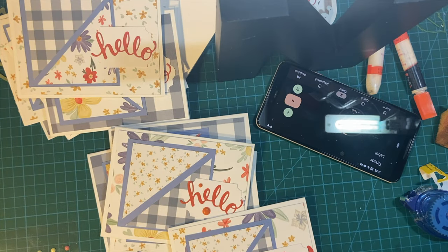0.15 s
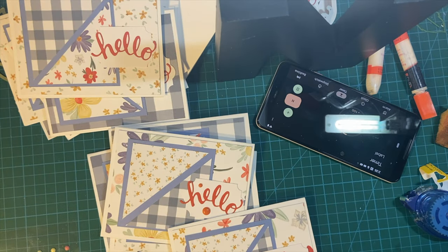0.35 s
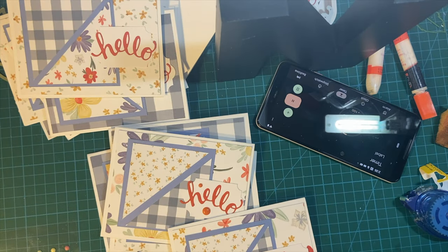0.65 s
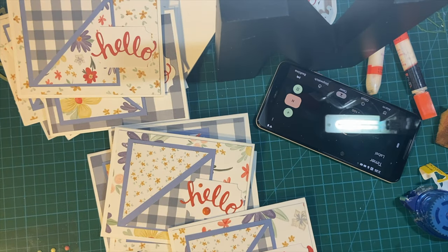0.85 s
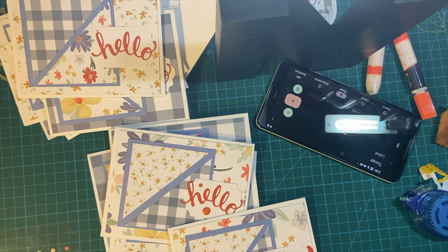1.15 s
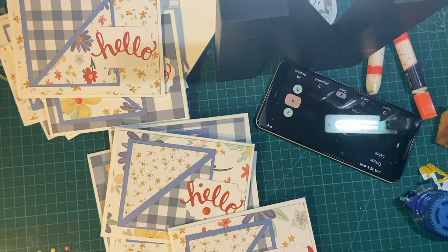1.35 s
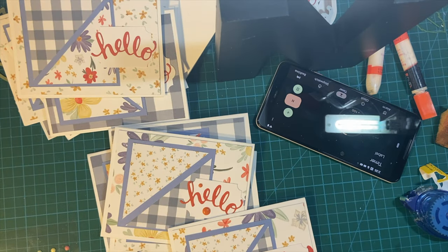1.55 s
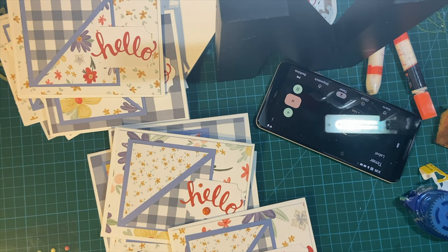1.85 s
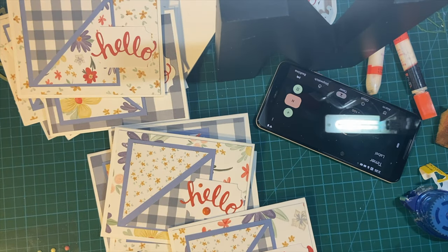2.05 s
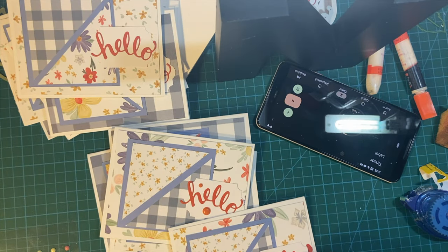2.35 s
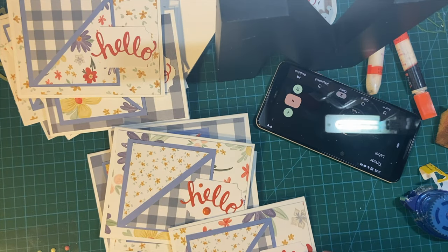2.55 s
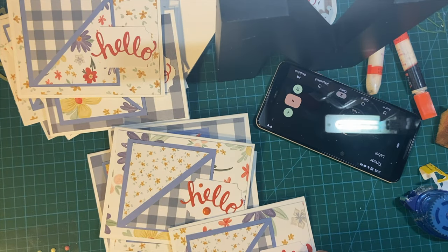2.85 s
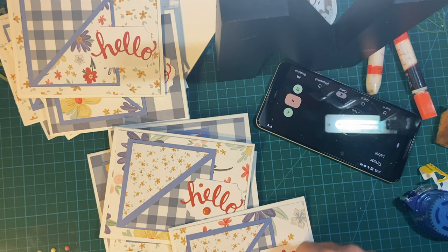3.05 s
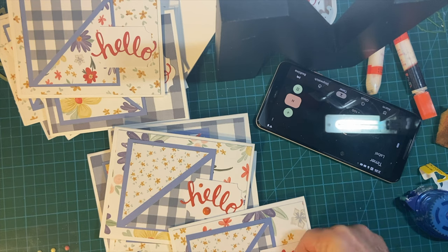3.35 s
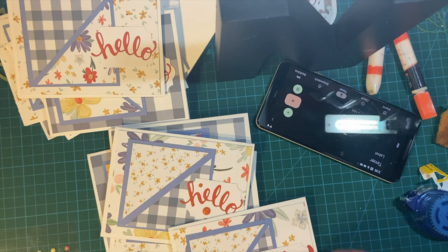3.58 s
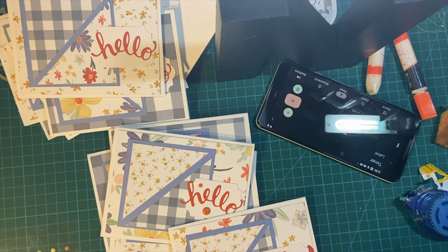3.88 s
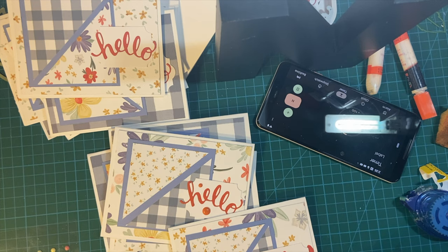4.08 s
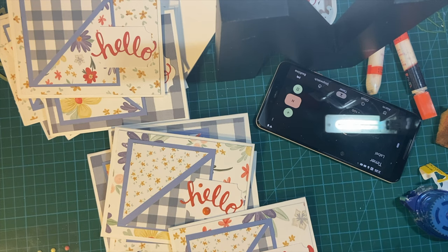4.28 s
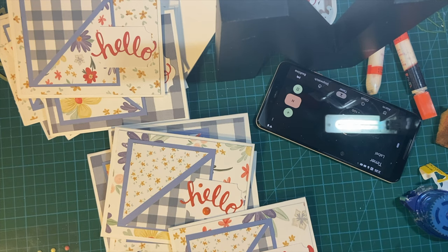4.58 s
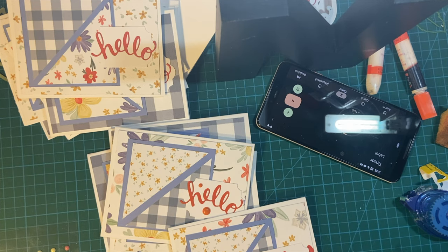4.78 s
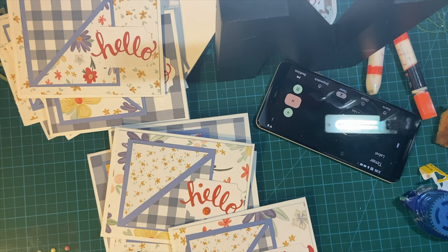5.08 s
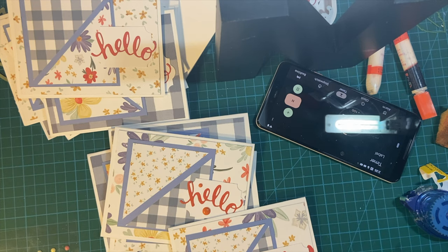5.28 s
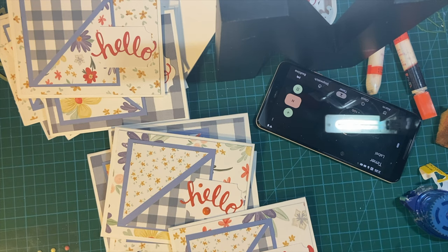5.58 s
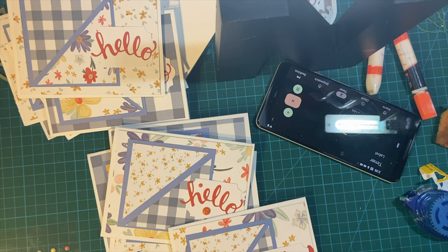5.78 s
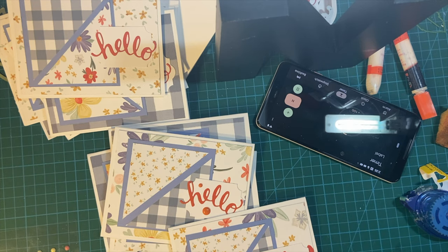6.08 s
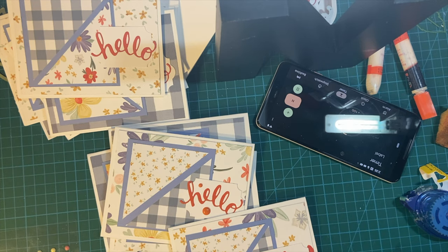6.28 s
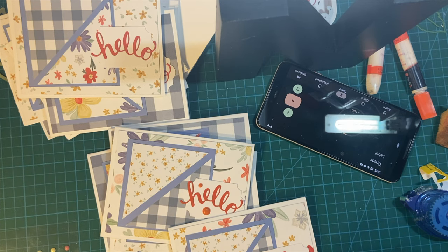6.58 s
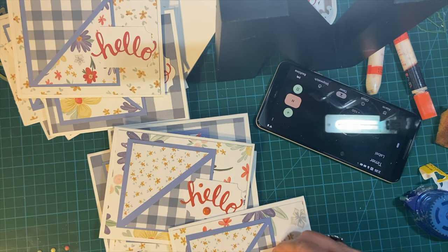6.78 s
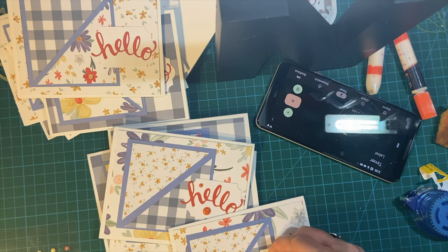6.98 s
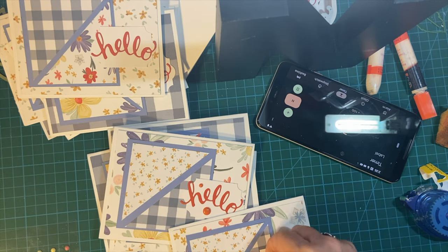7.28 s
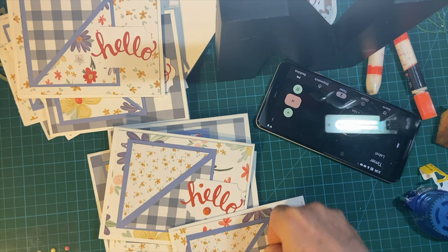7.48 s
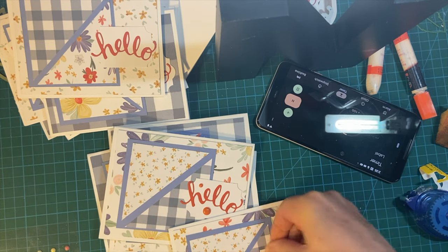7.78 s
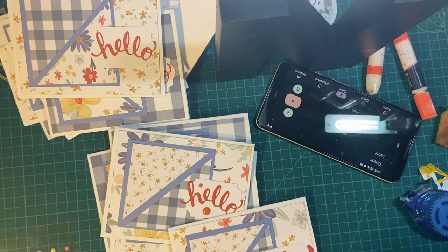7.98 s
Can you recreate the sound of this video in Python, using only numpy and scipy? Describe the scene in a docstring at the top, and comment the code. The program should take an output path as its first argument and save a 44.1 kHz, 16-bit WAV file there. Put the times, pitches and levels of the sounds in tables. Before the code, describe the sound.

Stiff paper cards snap, brush and slap onto a cutting mat, two hits thudding deep through the table, over a faint low household hum.

```python
"""Stiff paper cards snap, slide and slap on a cutting mat at a craft table, heard from close by in a small room.
Small snaps and strokes come first; from 1.7 s hard slaps add the table's decaying modes, strongest at 3.0 s.
A sagging tone buzzes at 3.6 s; more strokes follow, and hard slaps at 6.4 and 7.4 s. Snaps are short bursts of
band-filtered noise and strokes are fluttering friction noise, both with diffuse echoes; two knocks are
dispersed bending waves. Shaped noise and unsteady tones make a low household rumble and hum throughout."""
import sys
import numpy as np
from scipy import signal
from scipy.fft import rfft, irfft, next_fast_len
from scipy.io import wavfile
from scipy.ndimage import uniform_filter1d, map_coordinates

SR = 44100
rng = np.random.default_rng(int(sys.argv[2]) if len(sys.argv) > 2 else 0)


def generate_wav(sig):
    """Save sig (samples, or channels by samples) to the path in sys.argv[1] as 16-bit PCM at SR."""
    pcm = np.round(np.clip(np.atleast_2d(sig).T, -1, 1) * 32767).astype(np.int16)
    wavfile.write(sys.argv[1], SR, pcm)


N = 358974

# Slaps that shake the table. Each row: start in seconds, relative level in dB, share of the upper modes in dB,
# extra thud of the mat in dB.
TABLE_SLAPS = [(1.681, -46.5, -7, 0), (1.921, -47.5, -1, 4.5), (2.348, -48, -7, 0), (2.607, -55.5, 0, 0.5),
               (3.003, -20, -1.5, 16), (6.371, -46.5, -8, 1.5), (7.393, -24, -4.5, 19)]
# Strokes of card over card. Each row: start in seconds, length in seconds, rub level in dB,
# speed as the level of scrape over rub in dB.
CARD_STROKES = [(0, 0.056, -71.5, 9), (0.279, 0.073, -76, 3), (1.265, 0.31, -81.5, 1),
                (2.061, 0.098, -68.5, 4), (2.193, .13, -72.5, 2), (2.851, 0.18, -80, -2.5),
                (3.098, 0.063, -70, 3), (3.153, 0.15, -72, 9), (3.326, 0.35, -70.5, -7),
                (3.683, 0.43, -70, -22.5), (4.484, 0.21, -68, -2.5), (6.557, 0.22, -61, 7),
                (6.803, 0.078, -87, -3.5), (7.306, 0.33, -82, -1), (7.489, 0.25, -80.5, -6),
                (7.74, 0.41, -72, 4)]


def amp(db):
    """The decibel is logarithmic: twenty of them are a tenfold amplitude."""
    return 10 ** (np.asarray(db) / 20)


def unit(x):
    """Normalisation by the root mean square, the amplitude that carries the mean power."""
    return x / np.sqrt(np.mean(x ** 2) + 1e-20)


def along(points, hz):
    """Interpolation of (Hz, value) points on a logarithmic frequency axis, as pitch is heard."""
    point_hz, value = np.transpose(points)
    return np.interp(np.log(hz + 1), np.log(point_hz + 1), value)


def wobble(rate):
    """Slow random modulation: a smooth curve through random knots, rate of them a second."""
    knots = rng.standard_normal(int(N * rate / SR) + 4)
    return map_coordinates(knots, [np.arange(N) * rate / SR])


def filtered(x, response):
    """Linear filtering: the spectrum is multiplied by a complex response of frequency."""
    size = next_fast_len(x.shape[-1] + 2048)
    hz = np.fft.rfftfreq(size, 1 / SR)
    return irfft(rfft(x, size) * response(hz), size)[..., :x.shape[-1]]


def band(hz, low_hz, high_hz):
    """A steep causal band-pass response, scaled to keep the energy of white noise."""
    poles = signal.butter(5, [low_hz, high_hz], "band", analog=True, output="zpk")
    gain = signal.freqs_zpk(*poles, hz)[1]
    return gain / np.sqrt(np.mean(np.abs(gain) ** 2))


def resonance(hz, centre_hz, width_hz):
    """The response of a damped oscillator, equal to 1 at its centre."""
    damping = 1j * hz * width_hz
    return damping / (centre_hz ** 2 - hz * hz + damping)


def diffuse(pair):
    """Partial coherence: two unrelated signals are mixed to the likeness of diffuse sound at two ports."""
    # Each row: frequency in Hz, left-right likeness as a correlation.
    likeness = [(60, 1), (200, 1), (400, 0.2), (700, 0.19), (1300, 0.057), (3000, 0.81), (5500, 0.98),
                (8000, 0.96)]

    def mixing(hz):
        angle = np.arccos(np.clip(along(likeness, hz), -1, 1)) / 2
        return np.array([np.cos(angle), np.sin(angle)])

    mid, side = filtered(pair, mixing)
    return np.array([mid + side, mid - side])


def noise(spectrum):
    """Spectral shaping of white noise into diffuse stereo noise of rms 1."""
    return unit(diffuse(filtered(rng.standard_normal((2, N)), lambda hz: amp(along(spectrum, hz)))))


def snaps():
    """Impulsive excitation: bursts drive mat thud, card bending, crackle and edge hiss, each with its echo."""
    # Each row: start in seconds, relative bending level in dB, bending pitch in Hz,
    # contact time in ms (held to 1.5 to 30 in use), crackle over bending in dB, edge hiss over bending in dB.
    card_snaps = [(0.022, -62, 2120, 20, -9, -18), (.06, -64, 1980, 5, -5, -6),
                  (.086, -51, 2280, 3.9, -0.5, -10), (.115, -34, 1606, 4.4, 1.5, -14.5),
                  (.329, -61.5, 2400, 9, -4, -13), (.491, -67.5, 2070, 8.2, -6.5, -16),
                  (1.066, -42, 1616, 8.2, -16, -25), (1.192, -40, 1750, 2.04, 1, -4.5),
                  (1.383, -44.5, 1740, 3.2, 3.5, -5.5), (1.683, -24.5, 1880, 2.57, -0.5, 7),
                  (1.793, -33.5, 1944, 6.9, 4.5, 3.5), (1.918, -28, 1676, 5.2, 3, 10),
                  (2.095, -49, 1450, 15, 7, -1.5), (2.111, -44, 2160, 8.3, 5.5, 3),
                  (2.13, -44.5, 1250, 5, -21.5, -34.5), (2.24, -64, 1540, 14, 8, -3),
                  (2.255, -56, 1190, 16, -5.5, -6), (3.003, -25.5, 1657, 2.4, 2, 8.5),
                  (3.148, -61.5, 2130, 11.5, 9, 2), (3.261, -59, 1790, 12, 0, -3),
                  (3.303, -60, 1610, 5.1, -7, -10), (3.34, -62.5, 1870, 3.4, 11.5, 1.5),
                  (3.407, -64.5, 1310, 3.8, 5, -15.5), (3.474, -61.5, 1100, 32, -13, -22.5),
                  (3.529, -58.5, 1444, 4.7, -8.5, -11.5), (3.56, -53, 1430, 3.1, -9, -19),
                  (3.882, -56, 1660, 13.3, 4, -3), (3.9, -59.5, 1620, 22, -1, -6.5),
                  (3.959, -62.5, 2060, 5.5, 0, -2.5), (4.03, -68, 2040, 16.4, -8.5, -14.5),
                  (4.066, -66.5, 1790, 3.9, -2, -19), (4.283, -65.5, 1420, 31, 1.5, -2),
                  (4.308, -32.5, 1600, 5.2, -8.5, -24.5), (4.376, -62, 930, 13.4, -20, -36),
                  (4.493, -61, 1690, 6.7, -0.5, -6), (4.526, -48, 1252, 11, -28, -48),
                  (4.539, -55, 1360, 3, .5, -7), (4.591, -60.5, 1600, 13.5, 3.5, -4.5),
                  (4.638, -57, 1050, 14, -3, -11.5), (4.654, -61, 1920, 10, 2.5, 2.5),
                  (4.672, -58, 1720, 11.4, 1, -4.5), (4.941, -62.5, 888, 7.8, -29.5, -38),
                  (4.999, -43, 1404, 4.2, -8.5, -40), (5.441, -54.5, 1246, 10.4, -23.5, -22),
                  (5.474, -75.5, 1590, 18, 3, 5.5), (5.562, -43.5, 1600, 5.8, -16, -46.5),
                  (5.614, -48, 1320, 2.3, -14.5, -16.5), (5.71, -42.5, 2180, 2.3, -16.5, -13.5),
                  (5.831, -73, 1970, 6.4, -6, 8.5), (5.845, -40.5, 2100, 2.93, -6.5, 6),
                  (6.14, -73, 1590, 4.7, -14, 0), (6.303, -78, 1700, 5.5, 0.5, -3.5),
                  (6.37, -25.5, 1614, 4.74, 0.5, 3.5), (6.379, -27, 1350, 5.9, 4, 2.5),
                  (6.375, -39.5, 1684, 5, 0, -6.5), (6.384, -36.5, 1800, 5.7, 10.5, -8),
                  (6.559, -69.5, 1730, 4.3, 17, 9), (6.574, -37, 1630, 14.9, 1, -2.5),
                  (6.626, -49, 2050, 19, 6, 5), (6.682, -57, 1574, 18, 8, 6),
                  (6.75, -49, 1500, 6.4, -12, -9), (7.393, -32.5, 1624, 3.07, 6, 8.5),
                  (7.513, -58, 1440, 2.8, 0, -18), (7.787, -62, 1650, 30.4, 3, 1),
                  (7.828, -46.5, 1450, 2.3, -4, -13.5), (7.856, -45.5, 1660, 1.4, -14, -30),
                  (7.886, -57, 1250, 4.5, -10, -17), (7.927, -56.5, 1590, 10, -6, -26),
                  (7.952, -58, 1850, 4.4, -23, -30), (8.033, -65.5, 2150, 7, -2, -25),
                  (8.083, -52, 2300, 14.4, -13, -5), (8.13, -57.5, 1750, 18, -1, 2)]
    # Papery ring. Each row: pitch over the bending pitch, width over the bending pitch, lift in dB.
    card_modes = [(.66, 0.067, -4.5), (1.101, 0.086, -0.5), (1.499, 0.065, -1), (2.301, 0.083, 3),
                  (3.1, 0.18, 0.5)]
    mode_scatter = .08  # random relative scatter of the ring pitches, drawn anew for each snap
    # mat thud over the bending: level for a card at mat_hz, and more for each octave lower
    mat_level_db, mat_hz, mat_per_octave_db = -15.5, 1610, 13
    out = np.zeros((2, N + SR))
    t, late = np.arange(SR // 20) / SR, np.arange(SR // 4) / SR
    for start, bend_db, bend_hz, contact_ms, crackle_db, edge_db in [*card_snaps, *small_snaps()]:
        # a snap that coincides with a table slap thuds harder on the mat
        slap_db = sum(slap[3] for slap in TABLE_SLAPS if abs(start - slap[0]) < .005)
        mat_db = mat_level_db + mat_per_octave_db * np.log2(mat_hz / bend_hz) + slap_db
        rings = [(bend_hz * ratio * (1 + mode_scatter * rng.standard_normal()), bend_hz * width, lift_db)
                 for ratio, width, lift_db in card_modes]
        low_hz, high_hz = bend_hz / 1.84, bend_hz * 1.53  # the bending band moves its neighbours' edges
        edges = [(140, low_hz), (low_hz, high_hz), (high_hz, 6400), (6400, 16300)]
        levels_db = (mat_db, 0, crackle_db, edge_db)

        def parts(hz):
            paper = 1 + sum(amp(lift_db) * resonance(hz, centre, width) for centre, width, lift_db in rings)
            bands = [amp(bend_db + db) * band(hz, *edge) for db, edge in zip(levels_db, edges)]
            return paper * np.array(bands)

        span = np.clip(contact_ms, 1.5, 30) / 1000
        shape = (t / span) * np.exp(-(t / (0.36 * span)) ** 0.91)  # long contact rises and dies gently
        steps = np.repeat(rng.standard_normal(len(t) // 40 + 1), 40)[:len(t)]
        clumps = amp(5.5 * steps)  # fibres let go in fits
        raw = rng.standard_normal((4, len(t))) * shape * clumps
        raw /= np.linalg.norm(raw, axis=1, keepdims=True)
        burst = filtered(raw, parts).sum(0)

        swell = 1 - np.exp(-late / (.001 + span / 2))  # walls answer late
        sound = amp(-10.0) * swell * tail(lambda hz: np.linalg.norm(parts(hz), axis=0))
        sound[:, :len(t)] += burst
        first = round(start * SR)
        out[:, first:first + len(late)] += amp(-2.5) * np.sqrt(span * SR) * sound
    return out[:, :N]


def small_snaps():
    """A random point process: rows like those of the card snaps, scattered through the faster strokes."""
    per_second, brush_db = 5, -12  # strokes with a speed below brush_db only brush
    over_rub_db, scatter_db, pitch_hz, contact_ms = 2.5, 3.5, 1720, 7.4
    crackle_db, edge_db = -4.5, -16.5  # over the bending, for a speed of 0 dB
    rows = []
    for start, length, rub_db, speed_db in CARD_STROKES:
        if speed_db < brush_db:
            continue
        for place, size, pitch in rng.random((round(length * per_second), 3)):
            level_db = rub_db + over_rub_db - scatter_db * np.log(size + 0.0072)
            rows.append((start + place * length, level_db, pitch_hz * (.75 + pitch / 2), contact_ms,
                         crackle_db + speed_db / 2, edge_db + speed_db / 2))
    return rows


def booms():
    """Modal vibration: one soft push starts the heavy table top's modes, which swell and decay."""
    # Table-top modes, the lowest a beating pair. Each row: frequency in Hz, relative level in dB,
    # time to decay by 60 dB in seconds.
    table_modes = [(61.8, -4.5, .26), (56.6, -7, .31), (116.7, 0, 0.14), (350, -19.5, .09)]
    out, t = np.zeros(N + SR), np.arange(SR // 2) / SR
    for start, level_db, upper_db, _ in TABLE_SLAPS:
        ring = np.zeros(len(t))
        for hz, mode_db, t60 in table_modes:
            decay = amp(mode_db + upper_db * (hz > 100) - 60 * t / t60)
            swell = 1 - np.exp(-(t * hz / 1.8) ** 2)
            ring += decay * swell * np.cos(2 * np.pi * hz * (t - .0055))
        first = round(start * SR)
        out[first:first + len(t)] += amp(level_db + 8.5) * ring
    return out[:N]


def slide():
    """Sliding friction: noise in fluttering clumps, with tiny fibre ticks whose sizes scatter widely."""
    rub_hz, rub_width_hz, rub_lift_db = 1070, 280, -1.5  # the pile of cards hums under the rub
    ticks = (rng.random(N) < 600 / SR) * amp(4 * rng.exponential(size=N)) * rng.standard_normal(N)
    clumps = rng.standard_normal(N) * amp(2.5 * wobble(120) + 2 * wobble(30))
    grit = unit(clumps + .5 * unit(ticks))

    # random patches of time and frequency make the friction noise's colour uneven
    z = signal.stft(grit, nperseg=256)[2]
    patches = uniform_filter1d(rng.standard_normal(z.shape), size=2, axis=0)
    patches = uniform_filter1d(patches, size=16, axis=1)
    grit = signal.istft(z * amp(3 * unit(patches)), nperseg=256)[1][:N]
    grit = filtered(grit, lambda hz: 1 + amp(rub_lift_db) * resonance(hz, rub_hz, rub_width_hz))

    edges = [(550, 2500), (2500, 7500), (7500, 15800)]  # rub, scrape, hiss in Hz
    return sum(gain * unit(filtered(grit, lambda hz: band(hz, *edge)))
               for gain, edge in zip(strokes(), edges))


def strokes():
    """Friction grows brighter with speed: gains of rub, scrape and hiss, with one shape for every stroke."""
    rise_s, fall_s, fade_db = .04, 0.017, 17  # swells, lets go, fades by dB a second
    hiss_db, hiss_grows = -6.5, 0.78  # hiss over rub, and its growth in dB per dB of speed
    gains = np.zeros((3, N))
    for start, length, rub_db, speed_db in CARD_STROKES:
        t = np.arange(N) / SR - start
        swell = np.clip(t / rise_s + .5, 0, 1)
        release = np.clip((length - t) / fall_s + 1, 0, 1) ** 2
        fade = amp(-fade_db * np.clip(t, 0, length))
        levels_db = rub_db + np.array([[0], [speed_db], [hiss_db + hiss_grows * speed_db]])
        gains += amp(levels_db) * swell * release * fade
    return gains


def knocks():
    """Dispersion: a card edge knocks bending waves into the table top; treble arrives first, so pitch dives."""
    # Each row: start in seconds, relative level in dB.
    edge_knocks = [(1.683, -29.5), (1.918, -33)]
    cycles, first_s, t60_s = 1.5, .002, 0.17  # pitch times delay; arrival time scale; decay by 60 dB
    out, t = np.zeros(N + SR), np.arange(1, SR // 10) / SR
    late = t / first_s
    envelope = late ** 2 / (1 + late ** 2.7) * amp(6 - 60 * t / t60_s)
    wave = envelope * np.sin(2 * np.pi * cycles * np.log(late))
    for start, level_db in edge_knocks:
        first = round(start * SR)
        out[first:first + len(t)] += amp(level_db) * wave
    return out[:N]


def buzz():
    """Frequency modulation: a brief low tone sags in pitch, with an unsteady second partial."""
    start_s, length_s, rise_s, fall_s = 3.638, 0.088, 0.014, 0.019
    level_db, fade_db, pitch_hz, sag_hz = -42, 150, 170, 270  # fade and sag are per second
    t = np.clip(np.arange(N) / SR - start_s, 0, length_s)
    gate = np.clip(t / rise_s, 0, 1) * np.clip((length_s - t) / fall_s, 0, 1)
    phase = 2 * np.pi * (pitch_hz - sag_hz * t / 2) * t
    second = amp(-17.5 + 7.2 * wobble(41.35)) * np.sin(2 * phase)
    return gate * amp(level_db - fade_db * t) * (np.sin(phase) + second)


def room(x):
    """Reverberation by convolution: every stretch of 0.3 s meets a new echo."""
    out, hop = np.zeros((2, N + SR)), 3 * SR // 10
    for start in range(0, N, hop):
        echo = signal.fftconvolve(x[None, start:start + hop], tail(), axes=1)
        out[:, start:start + echo.shape[1]] += echo
    return out[:, :N]


def tail(colour=lambda hz: 1 + 0 * hz):
    """Reverberant decay: each frequency dies at its own speed; strength flutters as reflections arrive."""
    # Each row: frequency in Hz, time to decay by 60 dB in seconds.
    decay_times = [(200, 0.43), (800, 0.17), (3000, 0.23), (8000, 0.2), (16000, 0.36)]
    # Each row: frequency in Hz, relative echo level in dB.
    echo_colour = [(150, 1), (600, 7.5), (2500, -1), (6000, 2), (16000, -10)]
    hz, t, z = signal.stft(rng.standard_normal((2, SR // 4), dtype=np.float32), SR, nperseg=256)
    flutter = uniform_filter1d(rng.standard_normal(z.shape[1:]), size=9, axis=0)
    flutter = uniform_filter1d(flutter, size=4, axis=1)
    decay_db = 60 * t / along(decay_times, hz)[:, None]
    gain = amp(along(echo_colour, hz)[:, None] - decay_db + 0.83 * unit(flutter))
    gain /= np.sqrt(np.sum(np.mean(gain ** 2, axis=0)) * 128)  # energy 1 before the caller's colour
    echo = signal.istft(z * gain * colour(hz)[:, None], SR, nperseg=256)[1][:, :SR // 4]
    return diffuse(echo)


def rumble():
    """Amplitude-modulated low noise: a lumpy deep band, and an upper band that follows its swings."""
    # Each row: time in seconds, level of the deep rumble in dB before its random wobble.
    deep_levels = [(0.0, -61.5), (0.45, -66), (0.72, -61), (1.86, -59.5), (2.04, -68.5), (2.97, -70.5),
                   (3.11, -65), (3.47, -66.5), (3.94, -62.5), (4.44, -72), (4.56, -69), (4.67, -71),
                   (5.58, -67), (6.08, -74.5), (6.62, -55.5), (7.09, -66.5), (7.55, -62.5), (8.14, -63.5)]
    # Each row: frequency in Hz, relative density in dB per Hz.
    deep_spectrum = [(13, -38), (22, -10.5), (32, -0.5), (53, 2.5), (89, 1.5), (129, -5.5), (146, -16.5),
                     (160, -21), (210, -47), (350, -120)]
    # Each row: frequency in Hz, relative density in dB per Hz.
    upper_spectrum = [(76, -26.5), (130, -2), (146, -11.5), (194, -6.5), (243, -4.5), (270, -15.5),
                      (500, -27), (650, -62), (1100, -120)]
    over_deep_db, follows = -5.5, 0.61  # mean level over the deep band; share of its swings in dB
    deep_db = np.interp(np.arange(N) / SR, *np.transpose(deep_levels))
    mean_db = deep_db.mean()
    upper_db = mean_db + over_deep_db + follows * (deep_db - mean_db)
    deep = amp(deep_db + 3 * wobble(10)) * noise(deep_spectrum)
    return deep + amp(upper_db + 1.5 * wobble(24)) * noise(upper_spectrum)


def hum():
    """Tones under random amplitude and phase modulation: an unsteady mains hum."""
    # Each row: frequency in Hz, relative level in dB.
    hum_tones = [(118.4, -75.5), (242.2, -82)]
    t = np.arange(N) / SR
    return sum(amp(db + 5 + 3.3 * wobble(8.7)) * np.sin(2 * np.pi * hz * t + 0.81 * wobble(15))
               for hz, db in hum_tones)


def room_tone():
    """Stationary diffuse noise: faint room tone whose level drifts slowly."""
    # Each row: frequency in Hz, relative density in dB per Hz.
    air_spectrum = [(210, -32), (350, -2.5), (1060, -13.5), (1960, -15.5), (2500, -18), (5340, -25.5),
                    (7610, -26), (9090, -24.5), (10200, -33), (13000, -27.5), (16500, -44.5)]
    return amp(-79.5 + wobble(1.4)) * noise(air_spectrum)


def scene():
    """Superposition: direct sound, its echo and the background add linearly."""
    rub = slide()
    sources = snaps() + rub + amp(-4.5) * room(rub) + booms() + knocks() + buzz()
    return sources + rumble() + hum() + room_tone()


def record(dry):
    """Two-port reception: phase and level differ by frequency; deep bass and the extreme treble are cut."""
    # Each row: frequency in Hz, phase by which the left port leads in radians.
    phase_lead = [(0, 0), (1460, -0.2), (2500, 1.0), (3620, 0.4), (4390, 0.9), (5170, 0.5), (6980, 2.8),
                  (9730, 5.7), (10900, 6.5), (12800, 9.0), (14300, 9.9), (15500, 11.8), (16400, 11.8),
                  (16700, 12.8)]
    # Each row: frequency in Hz, left minus right level in dB.
    level_lean = [(60, -0.3), (140, -0.6), (380, -0.2), (700, 0.5), (1290, 3.0), (2380, 0.5), (4400, 0.0),
                  (8120, 0.0), (15000, 0.0)]
    top_hz = 16500  # middle of the 600 Hz wide treble cut
    half = np.array([[.5], [-.5]])  # left and right share each difference

    def response(hz):
        ports = amp(half * along(level_lean, hz)) * np.exp(1j * half * np.interp(hz, *np.transpose(phase_lead)))
        bass = hz ** 4 / (hz ** 4 + 40 ** 4)
        top = np.clip((top_hz + 300 - hz) / 600, 0, 1) ** 2
        return ports * bass * top

    return filtered(dry, response)


dry = scene()
out = record(dry)
generate_wav(out)
```